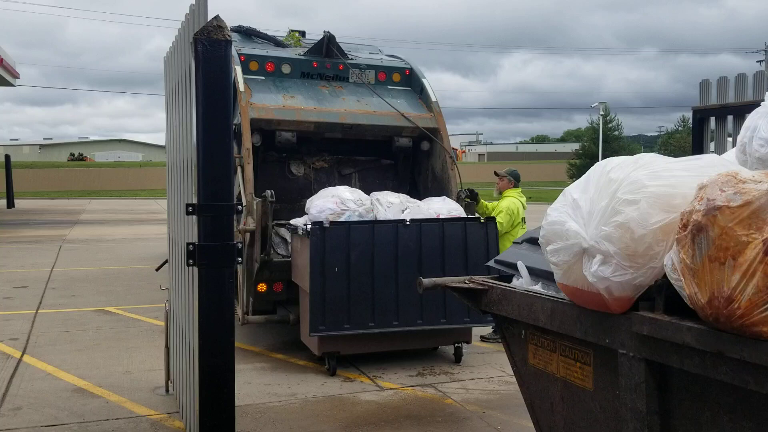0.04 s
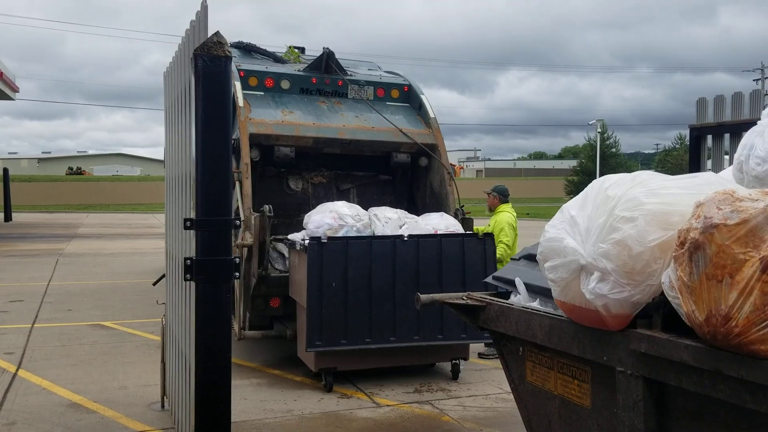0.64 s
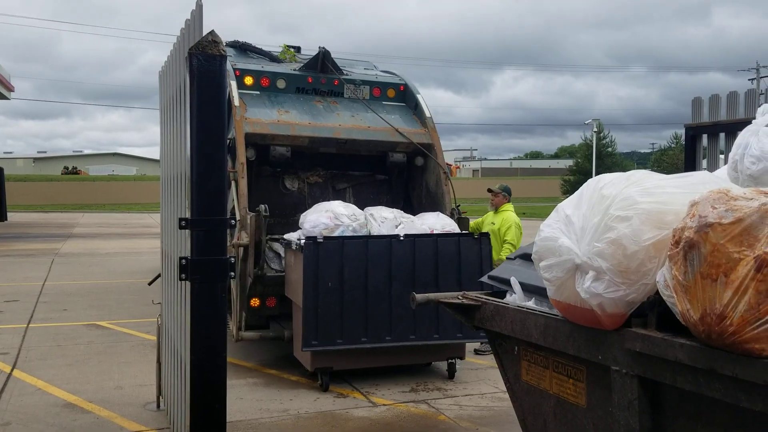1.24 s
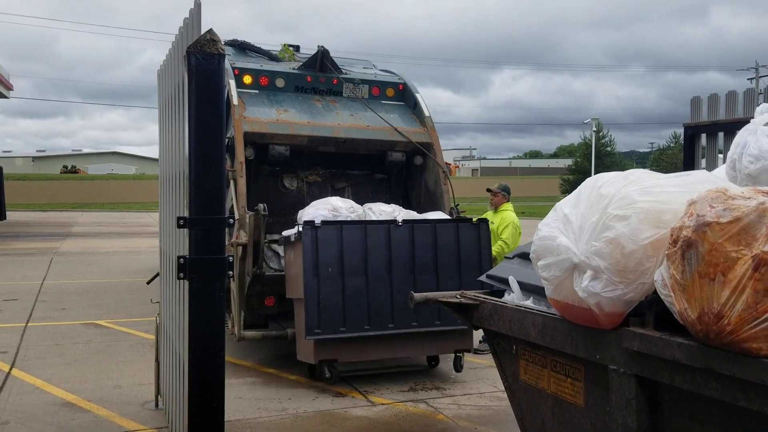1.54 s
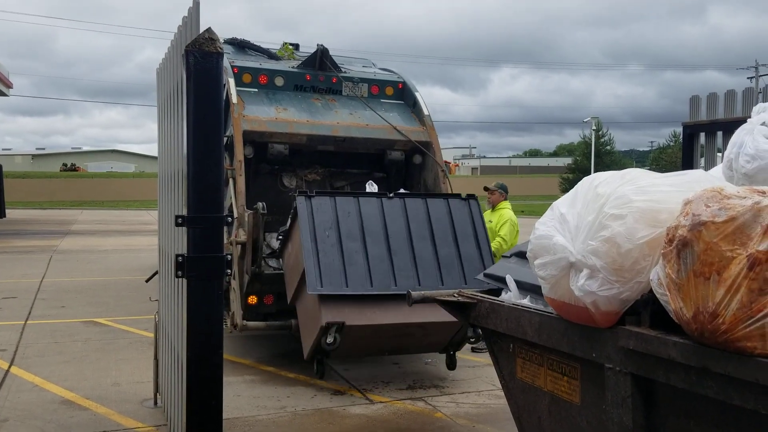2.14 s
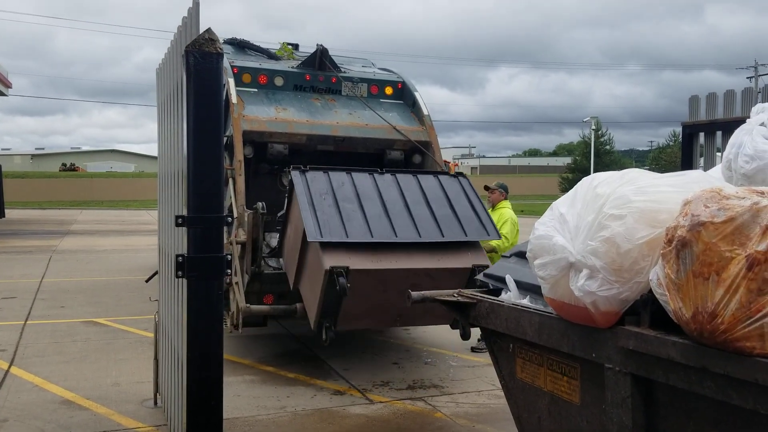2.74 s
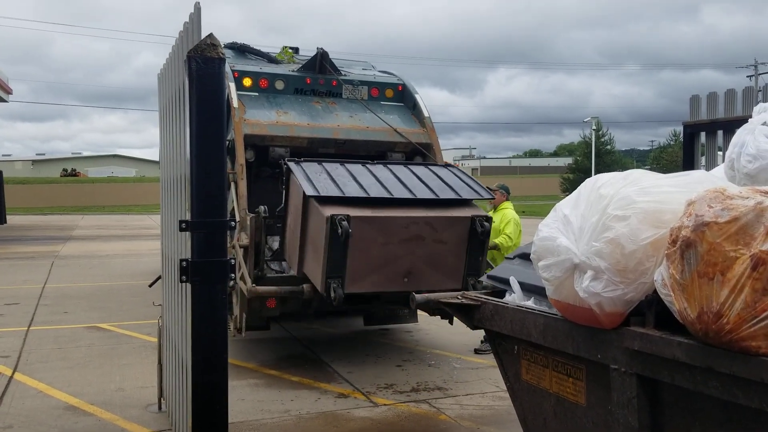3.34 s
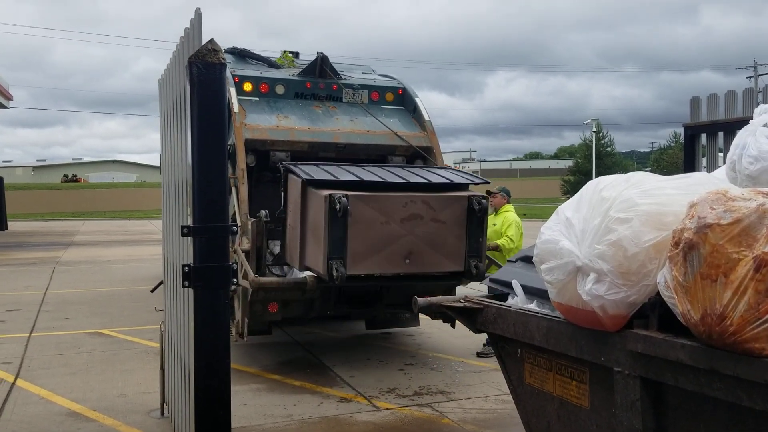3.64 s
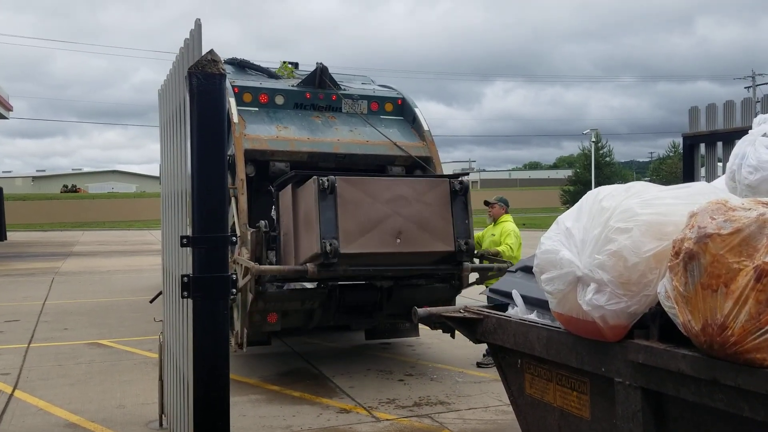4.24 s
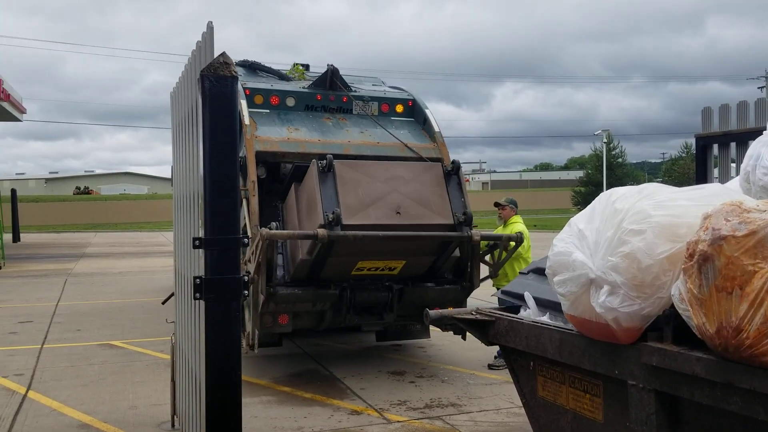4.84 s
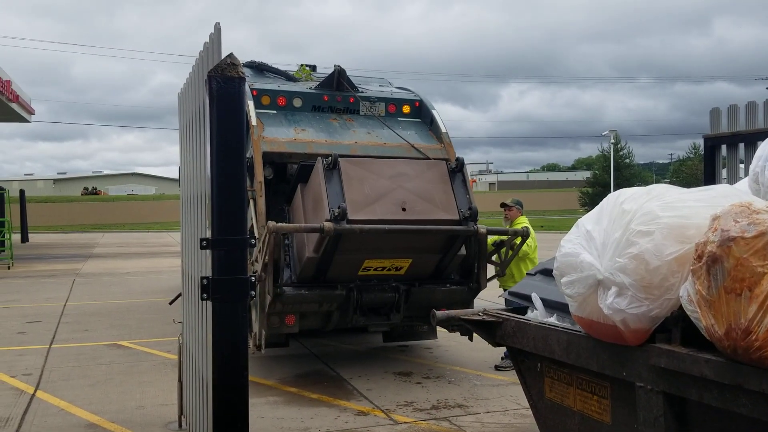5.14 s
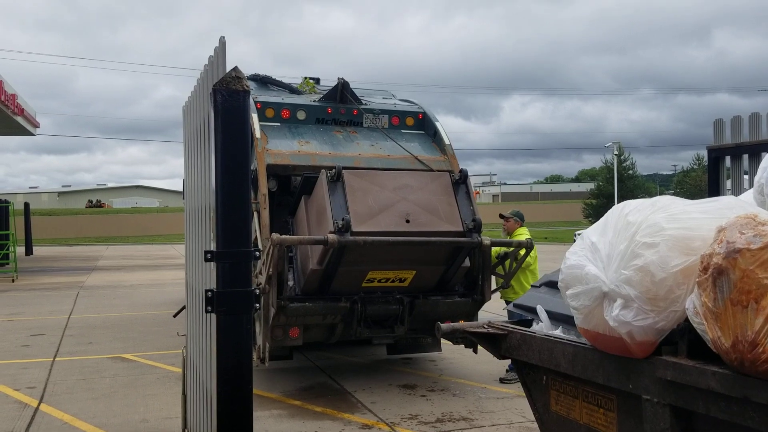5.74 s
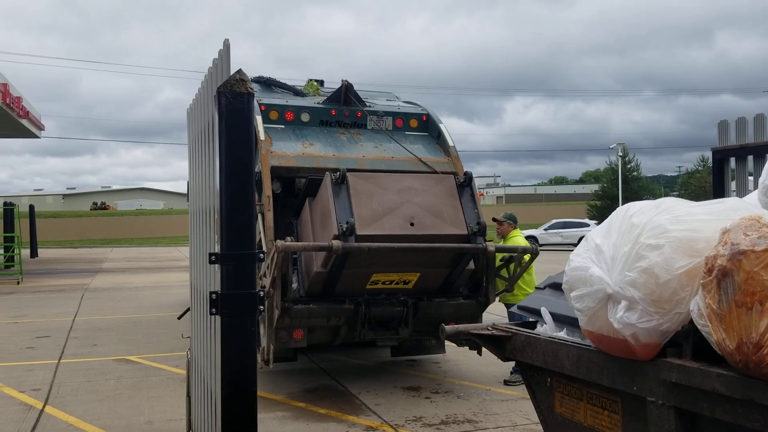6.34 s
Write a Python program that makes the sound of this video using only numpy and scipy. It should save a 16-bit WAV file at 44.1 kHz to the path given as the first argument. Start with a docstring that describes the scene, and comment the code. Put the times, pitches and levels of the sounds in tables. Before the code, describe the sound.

Loud metal clunks and hollow booms of a dumpster being emptied, over a garbage truck's steady engine and hissing hydraulic lift.

```python
"""Garbage truck tipping a dumpster

An open paved yard, a stereo pair of microphones close to a rear loader. Its six-cylinder diesel drones
under the whine and hiss of the hydraulics. A latch clanks shut, loose fittings clink, and the steel bin
booms against the tipper. Hinges groan, bags rustle, the load tumbles into the hopper and the lift bar
meets its stop. The truck's drone arrives dry; metalwork and load carry a short echo off the yard."""
import sys
import numpy as np
from scipy import signal
from scipy.fft import rfft, irfft, next_fast_len
from scipy.io import wavfile
from scipy.ndimage import map_coordinates

SR = 44100
rng = np.random.default_rng(int(sys.argv[2]) if len(sys.argv) > 2 else 0)


def wrap_up_sound(samples):
    """Save the sound to the file named by the first command line argument, as 16-bit audio."""
    columns = np.atleast_2d(samples).T
    # keep every value between -1 and 1, then stretch to whole-number steps
    tamed = np.clip(columns, -1, 1)
    steps = np.round(tamed * 32767).astype(np.int16)
    wavfile.write(sys.argv[1], SR, steps)


N = 281799
TIME = np.arange(N) / SR


def amp(db):
    """Decibels to gain."""
    return 10 ** (np.asarray(db) / 20)


def unit_rms(x):
    """Scales to rms 1."""
    return x / np.sqrt(np.mean(x ** 2) + 1e-20)


def curve(rows):
    """Joins rows of (t/s, value) into a control curve at every sample."""
    return np.interp(TIME, *np.transpose(rows))


def at_hz(points, hz):
    """Reads rows of (f/Hz, value) along a log-frequency axis."""
    f, value = np.transpose(points)
    return np.interp(np.log(hz + 1), np.log(f), value)


def drift(per_s):
    """A random wander of rms 1 with per_s turning points a second."""
    knots = rng.standard_normal(8192)
    return unit_rms(map_coordinates(knots, [TIME * per_s], order=1, mode="wrap"))


# likeness of the two microphones, near mono in the bass and wide in the treble: f/Hz, correlation
MIC_CORRELATION = [(30, .98), (130, .985), (330, .93), (650, .8), (1300, .2), (3000, .12), (15000, .05)]
def noise(colour, ripple_db=0, ripple_hz=80, peaks=()):
    """Stereo noise of rms 1; ripple is a steel body's crowded resonances, peaks its strong ones."""
    size = next_fast_len(N)
    hz = np.fft.rfftfreq(size, 1 / SR)
    mid, side = rfft(rng.standard_normal((2, size)))
    same = np.clip(at_hz(MIC_CORRELATION, hz), -1, 1)
    mid, side = mid * np.sqrt(1 + same), side * np.sqrt(1 - same)
    ripple = map_coordinates(rng.uniform(-2.8, 1.4, 4096), [hz / ripple_hz], order=1, mode="wrap")
    peaks_db = sum(db / (1 + (2 * (hz - centre) / width) ** 2) for centre, width, db in peaks)
    gain = amp(at_hz(colour, hz) + peaks_db + ripple_db * ripple * np.minimum(hz / 1500, 1)) * (hz > 22)
    return unit_rms(irfft(np.array([mid + side, mid - side]) * gain, size)[:, :N])


def hit_envelope(times, levels_db, t60, rise):
    """A run of hits: each rises fast and dies away, and their powers add."""
    power, t = np.zeros(N), TIME[:SR]
    for s, db, decay in zip(times, levels_db, t60 * np.ones(len(times))):
        hit = amp(db - 60 * t / max(decay, .02)) * (1 - np.exp(-t / rise))
        part = power[max(round(s * SR), 0):][:SR]
        part += hit[:len(part)] ** 2
    return np.sqrt(power)


def ring(times, levels_db, modes, spread, detune=0, rise=0.00032):
    """Each hit rings the same modes; strengths, phases and exact pitch depend on where it lands."""
    hz, db, t60 = np.transpose(modes)[:, :, None]
    t, out = TIME[:round(SR * t60.max())], np.zeros((2, N))
    decay = amp(db - 60 * t / t60) * (1 - np.exp(-t / rise))
    mic_phase_gap = np.arccos(np.clip(at_hz(MIC_CORRELATION, hz[:, 0]), -1, 1))
    for s, level_db in zip(times, levels_db):
        size, turn, side, sharp = rng.standard_normal((4, len(modes)))
        waves = decay * np.exp(2j * np.pi * hz * (1 + detune * sharp[:, None]) * t)
        phase = 2 * np.pi * turn + np.outer([.5, -.5], mic_phase_gap * np.sign(side))
        hit = (np.exp(spread * size + 1j * phase) @ waves).real
        part = out[:, max(round(s * SR), 0):][:, :len(t)]
        part += amp(level_db) * hit[:, :part.shape[1]]
    return out


def clack(rows, colour, db, t60, rise, rattle_db):
    """The short rough clash of hard things meeting."""
    s, level_db = np.transpose(rows)[:2]
    body = noise(colour, ripple_db=3.5, ripple_hz=110)
    return body * hit_envelope(s, level_db + db, t60, rise) * amp(rattle_db * drift(500))


# engine speed: t/s, four-stroke cycle rate/Hz
ENGINE_SPEED = [(0, 6.27), (1.1, 6.25), (1.9, 6.21), (2.5, 6.25), (3.9, 6.255), (4.4, 6.21), (5.15, 6.32),
                (6.39, 6.27)]
def engine_cycles():
    """Running count of four-stroke cycles, which times both the diesel and the pump."""
    return np.cumsum(curve(ENGINE_SPEED)) / SR


# exhaust lines, every sixth multiple a firing harmonic: multiple of the cycle rate, level/dB
EXHAUST_LINES = list(zip([6, 7, 9, 10, 12, 13, 14, 15.2, 16, 16.5, 18, 19, 24, 27, 40, 47, 54],
                 [-57, -56, -52, -49, -48, -45, -42, -42, -50, -46, -37.5, -44, -40.5, -51, -55, -54, -53]))
# swell of the exhaust, and clatter of the engine and working lift: t/s, level/dB
EXHAUST_LEVEL = [(1.1, 1.5), (1.7, -4), (3.5, -4), (4.1, 1), (5.6, -2.5)]
CLATTER_LEVEL = [(.5, -41.5), (1.2, -39.5), (2.45, -45.5), (3.7, -44), (4.3, -39.5), (5.45, -38.5),
                 (5.7, -42.5)]
# spectra of the exhaust rumble and the clatter: f/Hz, level/dB
RUMBLE_SPECTRUM = [(15, -60), (25, -31), (38, -7.5), (96, 5.5), (119, -1), (147, -8.5), (195, -4.5),
                   (252, -11.5), (292, -35), (345, -9.5), (445, -37.5), (647, -11.5), (900, -34),
                   (1170, -18.5), (1980, -120)]
CLATTER_SPECTRUM = [(300, 6), (650, -2), (1000, -5), (1450, -10.5), (2300, -15.5), (3500, -21), (6000, -28),
                    (10000, -34), (15000, -32.5)]
# resonances of the truck's panels: f/Hz, width/Hz, boost/dB
TRUCK_PANELS = [(1570, 100, 5), (1720, 50, 4), (2070, 170, 5), (2690, 150, 7), (3720, 70, 5),
                (3920, 120, 3)]
def diesel(cycles, lines_db=1, waver=0.14, rumble_db=-38, throb=0.15):
    """Close by, exhaust lines over a rumble; clatter swells at each firing and rings in the panels."""
    lines = 0
    for multiple, db in EXHAUST_LINES:
        strength = amp(db) * (1 + waver * drift(4.4))
        phase = 2 * np.pi * (multiple * cycles + rng.random()) + waver * drift(7.7)
        lines += strength * np.cos(phase)
    firing = 1 + throb * np.cos(2 * np.pi * 6 * cycles)
    clatter = noise(CLATTER_SPECTRUM, peaks=TRUCK_PANELS) * amp(curve(CLATTER_LEVEL) + drift(40))
    exhaust = np.sqrt(2) * amp(lines_db) * lines + firing * amp(rumble_db) * noise(RUMBLE_SPECTRUM)
    return exhaust * amp(curve(EXHAUST_LEVEL)) + firing * clatter


# pump whine: harmonic, level running free/dB, level under load/dB
PUMP_HARMONICS = [(1, -37, -32.6), (2, -45, -58), (3, -60, -47), (4, -63, -63), (5, -60, -62)]
# hydraulic load: t/s, share 0-1
PUMP_LOAD = [(.1, 0.3), (.6, 0.5), (1.2, 0.25), (1.8, 0), (2.45, 0.75), (4.7, 0.92), (5.3, 0.17)]
# valve hiss, growing as the bin rises and falling when the lever is let go: t/s, level/dB
VALVE_LEVEL = [(.4, -67), (1.2, -66), (1.75, -71.5), (2.5, -71), (2.95, -61), (3.85, -62), (4.6, -55),
               (5.47, -55), (5.72, -66)]
# spectrum of that hiss: f/Hz, level/dB
VALVE_SPECTRUM = [(1000, -35), (3000, 1), (5000, 1.5), (7500, -2), (10000, -0.5), (12500, 3.5),
                  (15500, -3.5)]
def hydraulics(cycles, strokes_per_cycle=20.56, hiss_db=2, surge_db=1.3):
    """On the truck, the pump's whine changes colour with load; oil hisses through the valve."""
    load = np.clip(curve(PUMP_LOAD), 0, 1)
    stroke_phase = 2 * np.pi * strokes_per_cycle * cycles + .1 * drift(7)
    whine = 0
    for harmonic, free_db, loaded_db in PUMP_HARMONICS:
        db = free_db + (loaded_db - free_db) * load + surge_db * drift(12)
        whine += amp(db) * np.cos(harmonic * stroke_phase + 2 * np.pi * rng.random())
    flutter_db = .7 * drift(25)
    hiss = noise(VALVE_SPECTRUM) * amp(curve(VALVE_LEVEL) + hiss_db + flutter_db)
    return np.sqrt(2) * whine + hiss


# strikes of the latch: t/s, level/dB
LATCH_HITS = [(0.1045, -17.5), (0.1151, -14.5), (0.1424, -18), (0.1654, -19.5), (0.1994, -27.5)]
# its clack: f/Hz, level/dB
LATCH_SPECTRUM = [(150, -11.5), (250, -10), (474, -4), (573, -9.5), (669, 0.5), (978, -14), (1670, -10),
                  (2710, -12.5), (4320, -18), (4710, -21), (5130, -12.5), (8000, -28), (13000, -36),
                  (15500, -40)]
# its modes: f/Hz, level/dB, t60/s
LATCH_RING = [(669, 0, .22), (1320, 3, .22), (1620, 3, .2), (1900, 3, .18), (2218, 6, .3), (2560, -1, .18),
              (3241, -2, .26), (3620, -4, .27), (4337, 0, .37), (5070, -2, .22), (5206, -5, .46),
              (5809, -5, .28), (6150, -7, .24), (6500, -5, .24), (6900, -5, .24), (7784, -11, .36),
              (8340, -4, .22), (8930, -7, .24), (9259, -15, .4), (9598, -7, .26), (10380, -11, .25),
              (10930, -7, .22), (11390, -9, .26), (11900, -7, .22), (12240, -12, .17), (12590, -15, .3),
              (12950, -12, .18)]
def latch(ring_db=-19.5):
    """At the back of the truck a solid steel latch slams, chatters and rings on."""
    clash = clack(LATCH_HITS, LATCH_SPECTRUM, db=-5, t60=0.27, rise=0.0015, rattle_db=1)
    return clash + amp(ring_db) * ring(*np.transpose(LATCH_HITS), LATCH_RING, spread=.1, detune=.0025)


# strikes of the loose fittings, the first (0.105 s) being the bright tick of the latch's first strike: t/s,
# level/dB, pitch ratio
CLINK_HITS = [(0.105, -28, 1), (1.323, -21, 1), (1.524, -41, 1.06), (1.536, -36, .97), (1.610, -46, 1.03),
              (1.633, -38, 1.2), (1.782, -45, .95), (1.905, -47, 1), (1.999, -39, .9), (2.033, -42, 1),
              (2.045, -32, 1.05), (2.089, -38, 1.1), (2.102, -41, .93), (2.288, -46, .98),
              (2.955, -49, .85), (3.009, -51, .9), (5.101, -38, 1.04), (5.815, -54, 1.04)]
# their clack: f/Hz, level/dB
CLINK_SPECTRUM = [(700, 1), (1500, 9), (3000, 7), (6000, 0.5), (8500, 2.5), (11000, 3), (12500, -11),
                  (15500, -24)]
# their modes at pitch ratio 1: f/Hz, level/dB, t60/s
CLINK_RING = [(3908, -3, .14), (5556, 0, .18), (5900, -3, .13), (6364, -1, .2), (6794, -4, .18),
              (7709, -1, .16), (8210, -8, .18), (9550, -4, .14), (9954, -6, .2), (10540, -3, .18),
              (11200, -3, .15), (12000, -6, .2)]
def fittings(ring_db=-17):
    """Loose steel fittings clink, each ringing at the pitch of its size; the first clink is the bright tick as
    the latch first strikes."""
    out = clack(CLINK_HITS, CLINK_SPECTRUM, db=0.5, t60=0.079, rise=0.00062, rattle_db=3)
    for s, db, pitch in CLINK_HITS:
        out += ring([s], [db + ring_db], np.multiply(CLINK_RING, [pitch, 1, 1]), spread=.3)
    return out


def rebounds(blows, count=3, gap_s=0.0099, step_db=-8):
    """After a blow the bin rebounds unevenly and ever more weakly; returns the columns of all hits."""
    s, db, weight, hardness = np.transpose(blows)[:, :, None]
    bounce = np.arange(count + 1)
    uneven = rng.uniform(-0.3, 0.18, (len(blows), count + 1)) * (bounce > 0)
    hits = s + gap_s * (bounce + uneven), db + step_db * bounce, weight, hardness
    return np.reshape(np.broadcast_arrays(*hits), (4, -1))


# heavy blows of bin and load: t/s, level/dB, weight (extra boom)/dB, hardness (extra crash)/dB
BIN_BLOWS = [(1.227, -25.5, 5, -10), (1.255, -20, -10, -15), (1.295, -11.5, 5.5, -12),
             (1.319, -15.5, 5, -9.5), (1.344, -17.5, -1, -5.5), (1.360, -14, 2.5, -15.5),
             (1.386, -14.5, -2, -22), (1.455, -25.5, 2, -13.5), (1.980, -23.5, 1, -18),
             (2.030, -31, 10, -19), (2.086, -31, 9.5, -35), (4.091, -25, 4, -25), (4.137, -12, 5.5, -23),
             (4.25, -29, 10, -36), (4.305, -32.5, 9, -26), (4.408, -28, 8, -22), (4.442, -18.5, -3, -18.5),
             (4.468, -18, 4, -22.5), (4.521, -24, 5, -14), (4.574, -15.5, -0.5, -20.5),
             (4.615, -26, 2, -18), (4.68, -30, 3.5, -20), (5.102, -29, 6.5, -8), (5.165, -35.5, 10, -21)]
# spectra of the bin's big panels, sheet metal and edges: f/Hz, level/dB
BOOM_SPECTRUM = [(20, -36), (40, -5), (65, 9.5), (130, 10.5), (170, 4), (220, 0.5), (300, 2.5), (450, -2),
                 (800, -14), (3000, -80)]
CLANG_SPECTRUM = [(200, 1), (420, 1), (620, 11.5), (820, 5), (1000, -1.5), (1300, -2), (2000, 2.5),
                  (3000, -8), (4000, -13.5), (8000, -50)]
CRASH_SPECTRUM = [(1500, 1), (3200, 6), (4500, 5), (6500, 2.5), (8500, -7.5), (11000, -2.5), (13000, -8),
                  (16000, -18)]
# modes of the bin: f/Hz, level/dB, t60/s
BIN_RING = [(88, 3, .38), (120, 6, .34), (155, 5, .3), (250, 7, .32), (515, -3, .22), (600, 1, .22),
            (625, 1, .25), (667, 0, .22), (838, 2, .25), (1130, -6, .2), (1243, 0, .24), (1477, -1, .28),
            (1560, -4, .22), (1816, -4, .22), (2060, -6, .2), (2610, -10, .2), (2742, -10, .2)]
def dumpster(boom_db=-1, clang_db=-4.5, ring_db=-15, loose_db=-13, edge_db=-12, boom_t60=0.33):
    """The bin hits the tipper: big panels swell and boom, sheet metal clangs, chattering edges crash."""
    s, db, weight, hardness = rebounds(BIN_BLOWS)
    sheets = noise(CLANG_SPECTRUM, ripple_db=3.5, ripple_hz=45) * amp(2.8 * drift(160))
    edges = noise(CRASH_SPECTRUM, ripple_db=4, ripple_hz=110) * amp(2.3 * drift(200))
    boom = noise(BOOM_SPECTRUM) * hit_envelope(s, db + weight + boom_db, boom_t60, rise=0.015)
    clang = sheets * hit_envelope(s, db + clang_db, 0.77 * boom_t60, rise=0.0027)
    crash = edges * hit_envelope(s, db + hardness, 0.98 * boom_t60, rise=0.0054)
    s, db, _, hardness = np.transpose(BIN_BLOWS)
    ringing = ring(s, db + ring_db, BIN_RING, spread=.25, detune=.006, rise=.003)
    for when, blow_db, hard_db in zip(s, db, hardness):
        # every blow also shakes a few loose things and steel edges, each with a short ring of its own
        loose_modes = [(hz, loose_db, .12) for hz in 400 * 7 ** rng.random(7)]
        edge_modes = [(hz, hard_db + edge_db, .16) for hz in 2600 * 4 ** rng.random(8)]
        ringing += ring([when], [blow_db], loose_modes + edge_modes, spread=.3, rise=.003)
    return boom + clang + crash + ringing


# hollow knocks of the bin, lift bar and falling load: t/s, level/dB, f/Hz, t60/s
HOLLOW_KNOCKS = [(1.299, -14, 1297, 0.11), (1.327, -18, 1894, 0.079), (1.35, -13.5, 1250, 0.11),
                 (1.370, -8.5, 231, .14), (1.378, -14, 1938, .13), (1.397, -7.5, 707, 0.051),
                 (1.429, -16, 191, 0.11), (1.463, -24, 1890, 0.097), (1.977, -27, 2990, 0.085),
                 (1.985, -26, 999, 0.15), (2.010, -24.5, 1215, 0.063), (2.049, -28, 2316, 0.077),
                 (2.103, -29, 2420, 0.045), (2.287, -36, 1616, 0.099), (2.446, -41, 750, 0.058),
                 (2.731, -33.5, 1500, 0.085), (2.954, -41.5, 1874, 0.15), (3.01, -42.5, 1483, 0.15),
                 (3.183, -33.5, 1050, .08), (3.344, -35.5, 1410, .2), (4.01, -36.5, 2006, 0.097),
                 (4.144, -10, 1804, 0.11), (4.148, -8, 616, 0.064), (4.152, -10, 174, .14),
                 (4.188, -22, 1890, 0.069), (4.258, -22.5, 1845, .11), (4.365, -33, 1850, 0.12),
                 (4.443, -8, 1385, 0.053), (4.464, -19.5, 2180, 0.084), (4.475, -14, 733, 0.067),
                 (4.574, -16, 1647, 0.095), (4.600, -25, 660, 0.056), (5.072, -22, 1696, 0.16),
                 (5.083, -30, 2530, .08), (5.109, -16.5, 1540, 0.1), (5.169, -26, 754, 0.072)]
# the load slides in runs of small knocks: t/s, length/s, level/dB
LOAD_SLIDES = [(2.528, 0.56, -42.5), (3.34, 0.073, -37), (4.184, 0.13, -31), (4.583, 0.13, -40),
               (5.404, 0.1, -49)]
def knocks(ring_db=-3, skirt_db_per_octave=21, mode_count=24, per_slide=6, small_hz=1151):
    """Bin, lift bar and load knock; each hit rings a cluster of modes that weaken away from its pitch."""
    hits = list(HOLLOW_KNOCKS)
    for start, length, db in LOAD_SLIDES:
        times = start + length * (np.arange(per_slide) + rng.random(per_slide)) / per_slide
        size, pitch = rng.standard_normal((2, per_slide))
        hits += zip(times, db + 5.5 * size, small_hz * 2 ** (0.71 * pitch), np.full(per_slide, 0.12))
    out = np.zeros((2, N))
    for s, db, hz, t60 in hits:
        octaves = 2.6 * ((np.arange(mode_count) + rng.random(mode_count)) / mode_count - .5)
        shape_db = -skirt_db_per_octave * abs(octaves)
        shape_db -= 20 * np.log10(np.linalg.norm(amp(shape_db)) / np.sqrt(2))  # to unit power
        modes = np.column_stack([hz * 2 ** octaves, shape_db, np.full(mode_count, t60)])
        out += ring([s], [db + ring_db], modes, spread=.15, rise=0.001)
    return out


# deep thuds of the bin striking the tipper and the load landing: t/s, level/dB
THUD_HITS = [(1.299, -17), (1.318, -16), (1.425, -23), (2.05, -30), (4.44, -26), (4.505, -20), (4.595, -20),
             (4.64, -24), (4.73, -31), (4.91, -33), (5.13, -25), (5.27, -32)]
# their spectrum: f/Hz, level/dB
THUD_SPECTRUM = [(24, -24), (36, -3), (55, 0), (85, 1), (130, -16), (250, -36), (1000, -90)]
def thuds():
    """The bin strikes the tipper and the load lands: deep thuds, nearly alike at both microphones."""
    return noise(THUD_SPECTRUM) * hit_envelope(*np.transpose(THUD_HITS), t60=0.42, rise=0.0027)


# scrapes and groans of the hinges: t/s, length/s, f/Hz, level/dB, roughness 0-1
HINGE_GROANS = [(2.66, .045, 1200, -49, .8), (3.295, .045, 1280, -50, .9), (3.632, .06, 632, -41, .2)]
def hinges(slips_per_s=330):
    """Dead centre, the hinges stick and slip: the more uneven the slips, the rougher the tone."""
    out = np.zeros(N)
    for s, length, hz, db, rough in HINGE_GROANS:
        swell = np.sin(np.pi * np.clip((TIME - s) / length, 0, 1))
        slips = np.sqrt(2 - 2 * rough) + np.sqrt(rough) * (drift(slips_per_s) + 1j * drift(slips_per_s))
        out += amp(db) * swell * (slips * np.exp(2j * np.pi * hz * TIME)).real
    return out


# bags crush as they shift and land: t/s, level/dB, t60/s
BAG_CRUSHES = [(2.95, -46.5, 0.58), (3.34, -51, 0.9), (4.145, -33.5, 0.18), (4.438, -38, 0.12)]
# their bright hiss: f/Hz, level/dB
BAG_SPECTRUM = [(2000, -1), (5000, -1), (9000, -5.5), (12500, -1), (15500, -5.5)]
def bags(rustle_db=2.5):
    """Thin plastic rustles under the weight of the load, wide across the pair."""
    s, db, t60 = np.transpose(BAG_CRUSHES)
    return noise(BAG_SPECTRUM) * hit_envelope(s, db, t60, rise=0.0022) * amp(rustle_db * drift(150))


# strikes of the lift bar: t/s, level/dB
BAR_HITS = [(5.104, -41.5), (5.126, -35), (5.16, -41)]
# its modes: f/Hz, level/dB, t60/s
BAR_RING = [(1367, -8, .25), (1600, -1, .2), (2056, -3, .27), (2702, -10, .3), (2988, -3, .29),
            (3365, -11, .28), (3747, 1, .24), (4097, -6, .29), (4300, -8, .22), (4554, -6, .26),
            (4780, -3, .19), (5450, -10, .2), (5900, -8, .2), (6300, -10, .2), (9512, -8, .27),
            (10300, -18, .15)]
def lift_bar(ring_db=1):
    """The solid steel bar clacks against its stop and rings on."""
    clash = clack(BAR_HITS, CRASH_SPECTRUM, db=-7.5, t60=0.53, rise=.001, rattle_db=1.5)
    return clash + amp(ring_db) * ring(*np.transpose(BAR_HITS), BAR_RING, spread=.1, detune=.003)


def yard(direct, echo_db=-17, t60=0.3, echoes_per_s=1500, delay_s=.02):
    """Fence, truck body and far buildings scatter a thin tail with little bass back to the pair."""
    t = TIME[:SR]
    taps = rng.standard_normal((2, SR)) * (rng.random((2, SR)) < echoes_per_s / SR)
    taps *= amp(-60 * t / t60) * (t > delay_s)
    taps = signal.lfilter(*signal.butter(1, [300, 5000], "band", fs=SR), taps)
    tail = signal.fftconvolve(direct, taps / np.linalg.norm(taps[0]), axes=1)[:, :N]
    return direct + amp(echo_db) * tail


def scene():
    """The truck runs dry and a touch to the left; metalwork and load sound out into the yard."""
    cycles = engine_cycles()
    truck = (diesel(cycles) + hydraulics(cycles)) * amp([[.3], [-.3]])
    tipping = dumpster() + latch() + fittings() + lift_bar() + knocks() + thuds() + bags() + hinges()
    return truck + yard(tipping)


def record(dry, cutoff_hz=15800):
    """The microphone signals clip at full scale, then pass a steep low-pass."""
    lowpass = signal.firwin(511, cutoff_hz, window=("kaiser", 9), fs=SR)
    return signal.oaconvolve(np.clip(dry, -1, 1), lowpass[None], "same")


dry = scene()
out = record(dry)
wrap_up_sound(out)
```